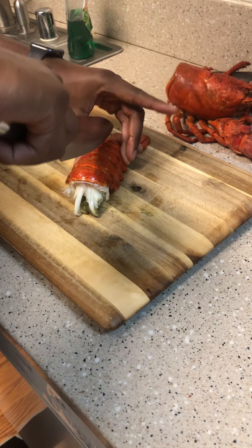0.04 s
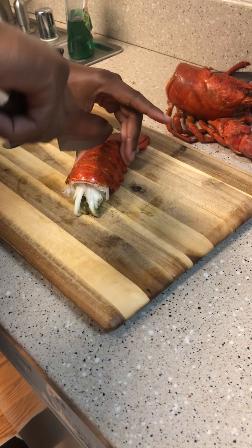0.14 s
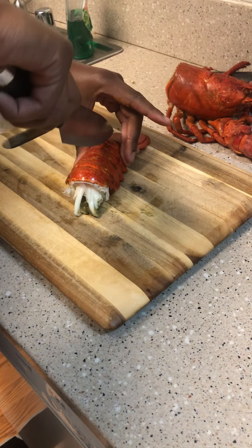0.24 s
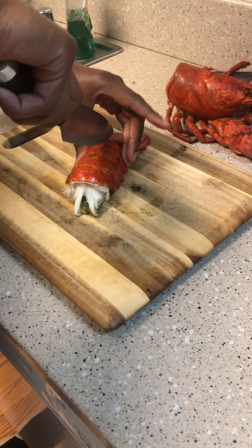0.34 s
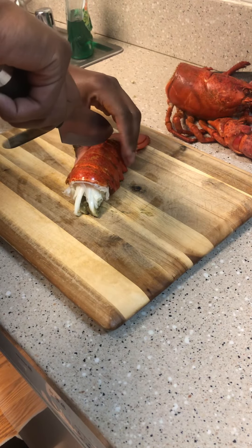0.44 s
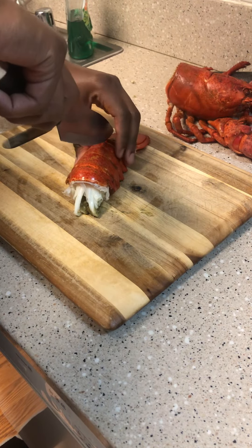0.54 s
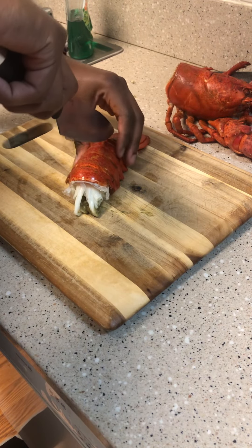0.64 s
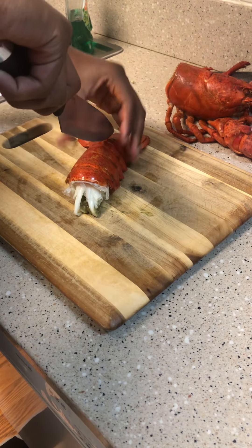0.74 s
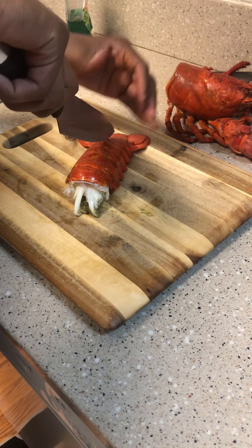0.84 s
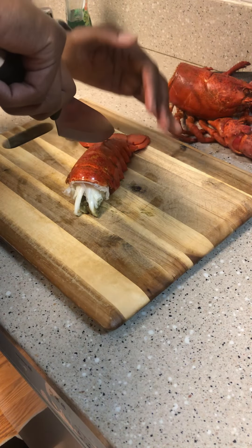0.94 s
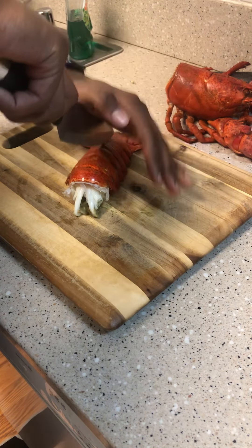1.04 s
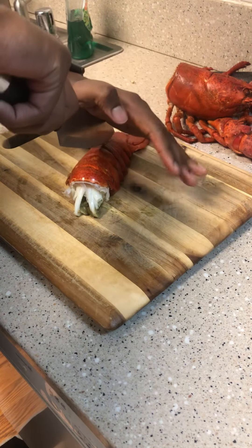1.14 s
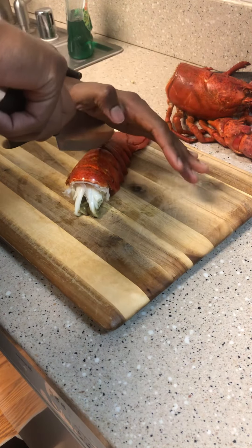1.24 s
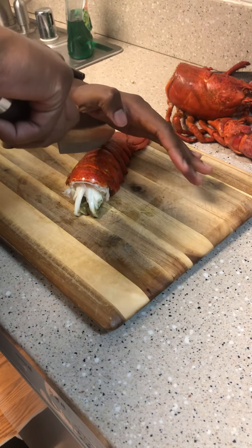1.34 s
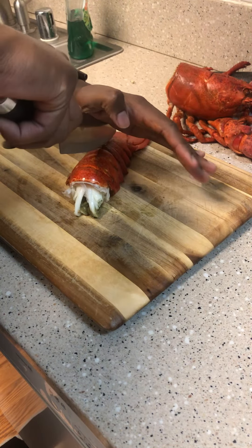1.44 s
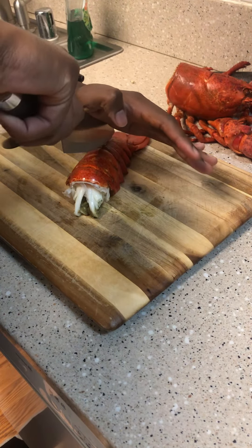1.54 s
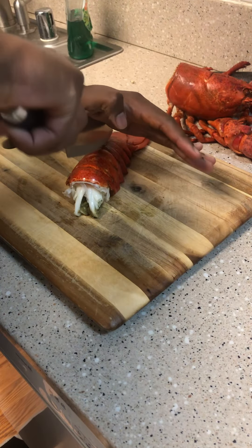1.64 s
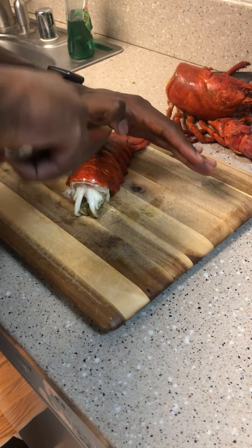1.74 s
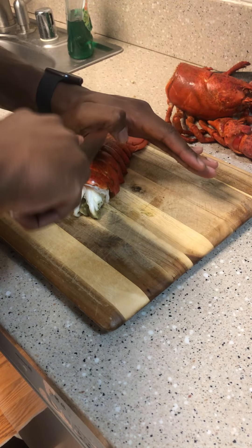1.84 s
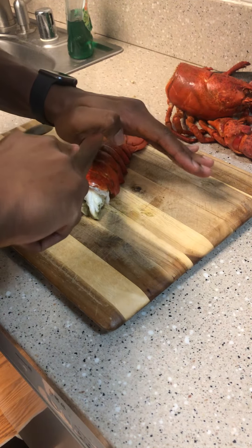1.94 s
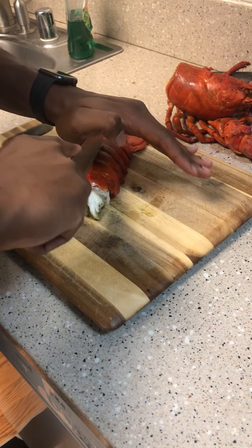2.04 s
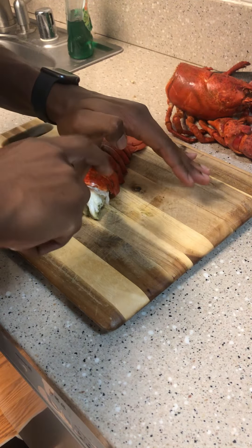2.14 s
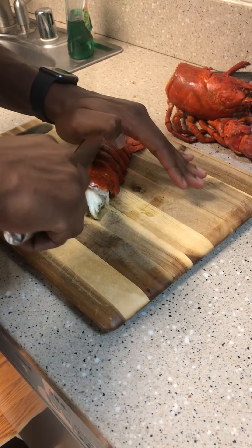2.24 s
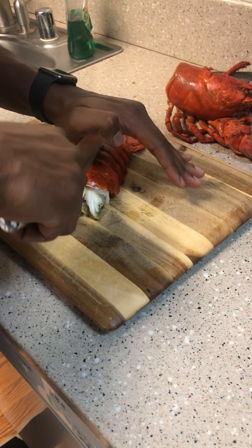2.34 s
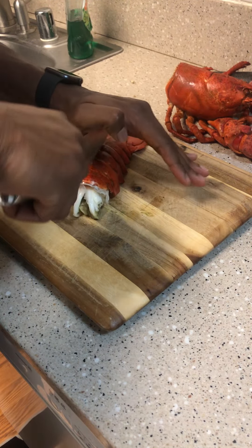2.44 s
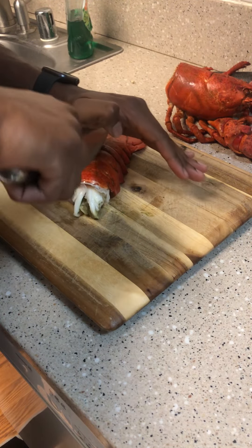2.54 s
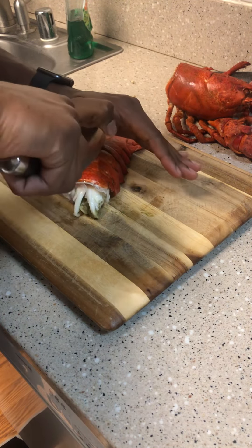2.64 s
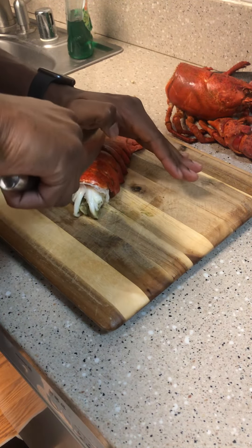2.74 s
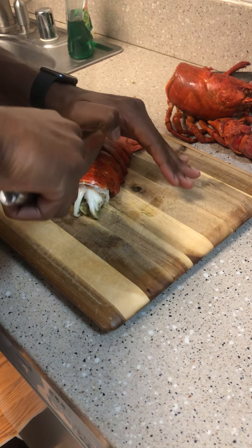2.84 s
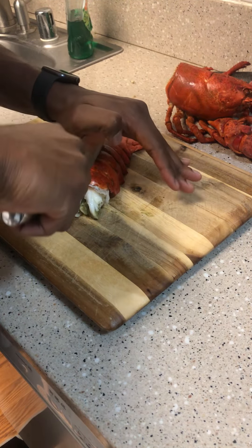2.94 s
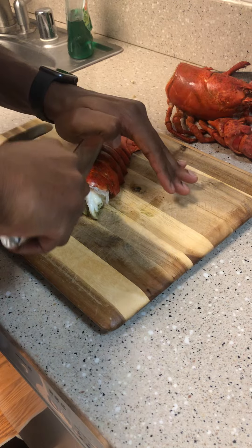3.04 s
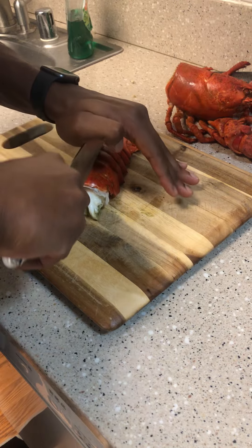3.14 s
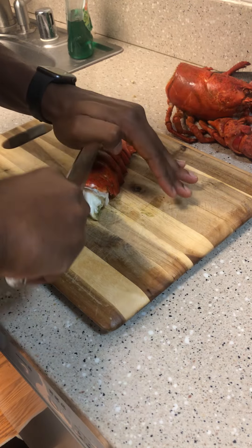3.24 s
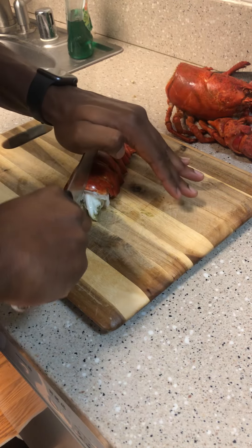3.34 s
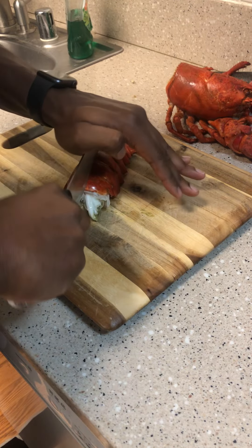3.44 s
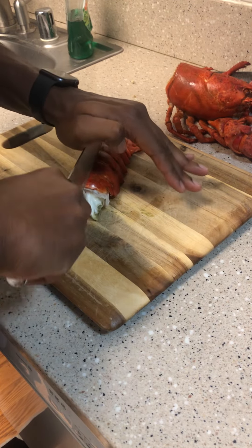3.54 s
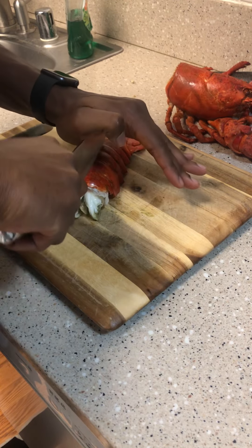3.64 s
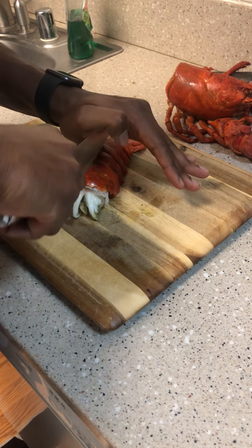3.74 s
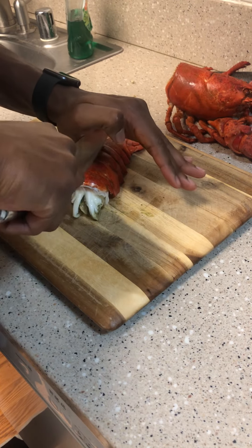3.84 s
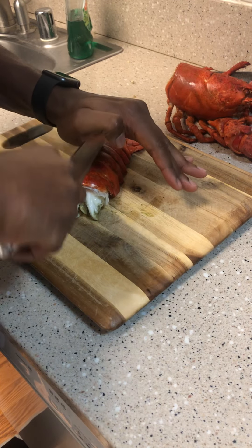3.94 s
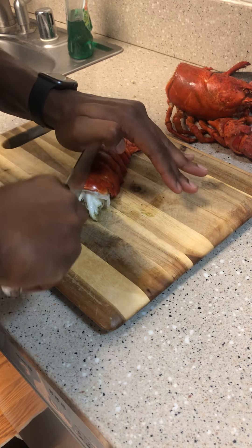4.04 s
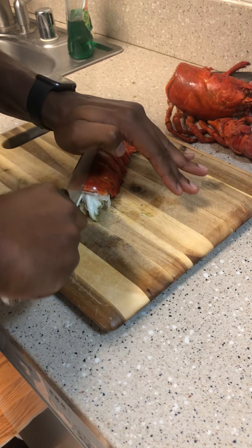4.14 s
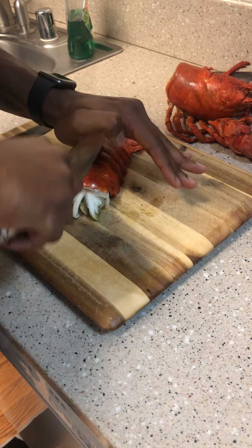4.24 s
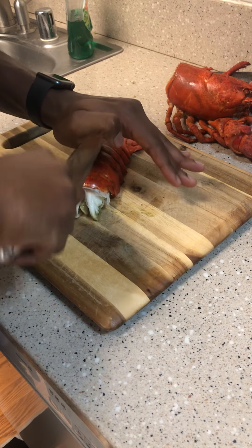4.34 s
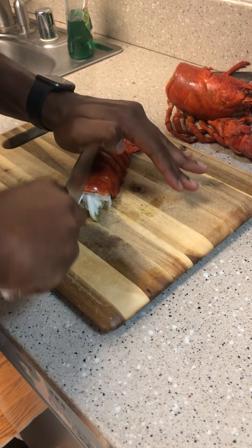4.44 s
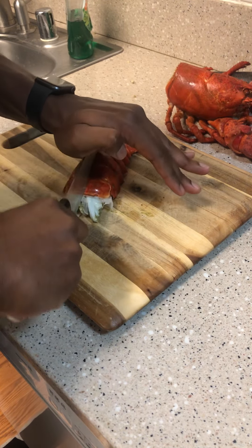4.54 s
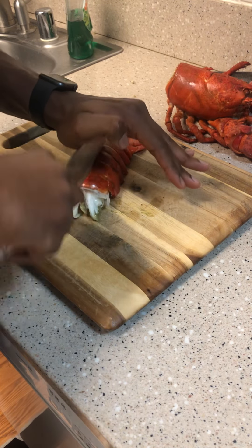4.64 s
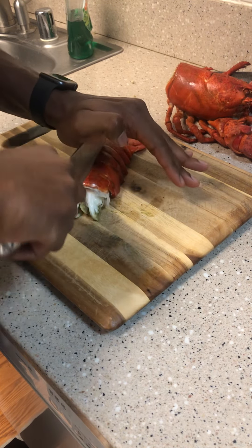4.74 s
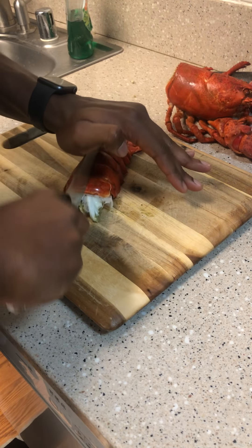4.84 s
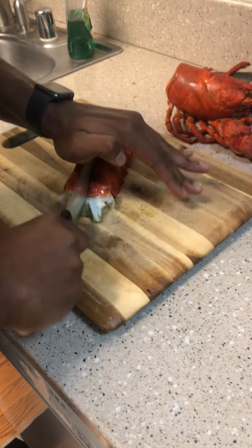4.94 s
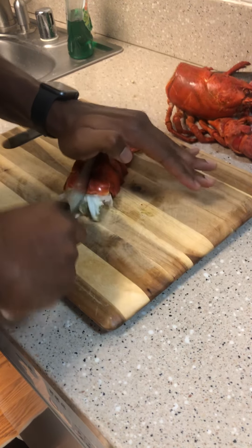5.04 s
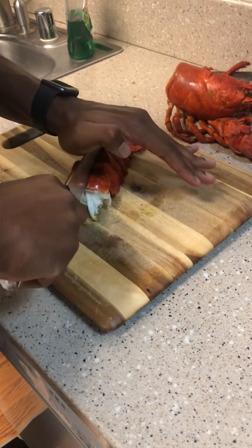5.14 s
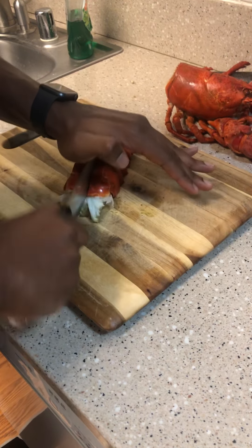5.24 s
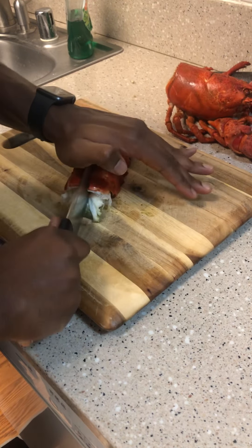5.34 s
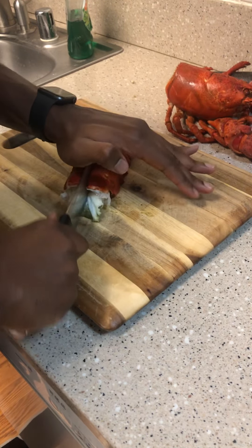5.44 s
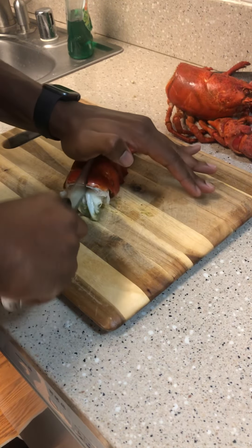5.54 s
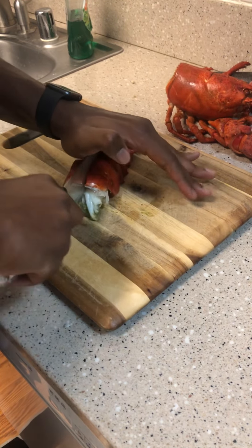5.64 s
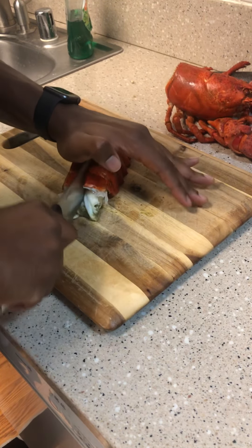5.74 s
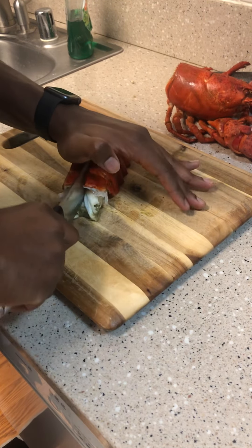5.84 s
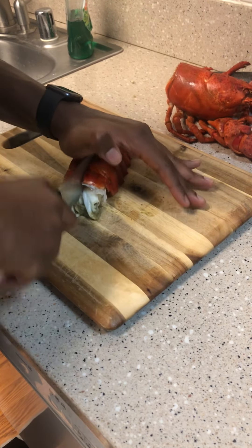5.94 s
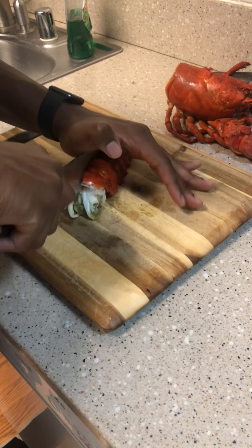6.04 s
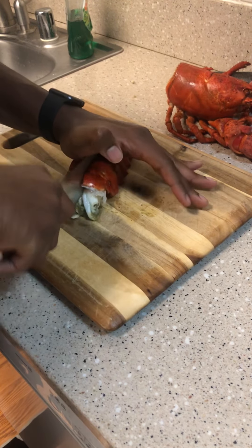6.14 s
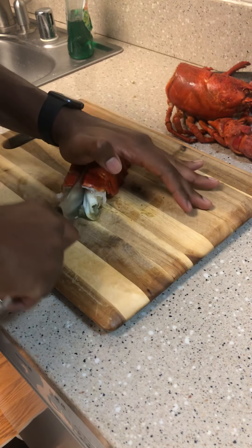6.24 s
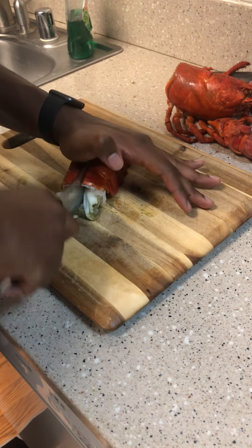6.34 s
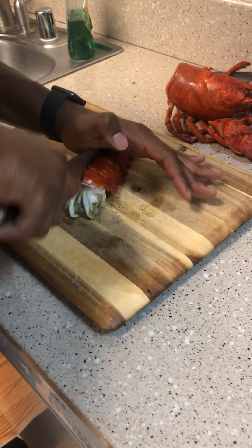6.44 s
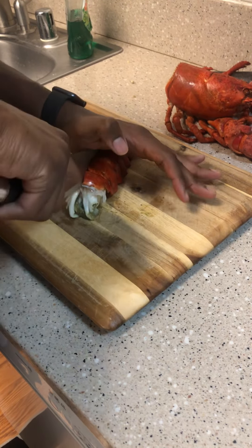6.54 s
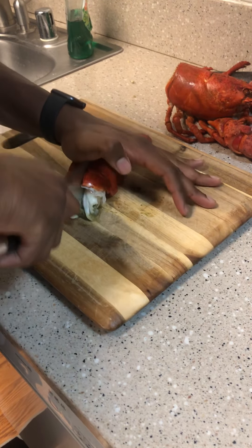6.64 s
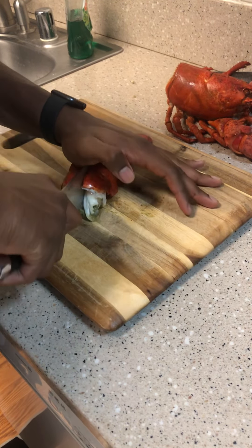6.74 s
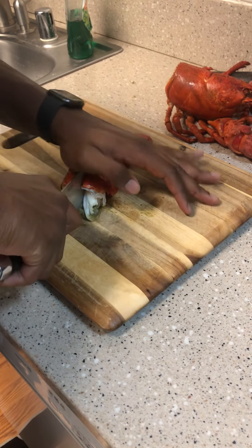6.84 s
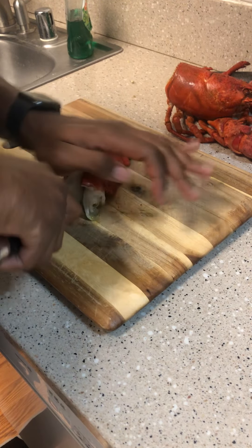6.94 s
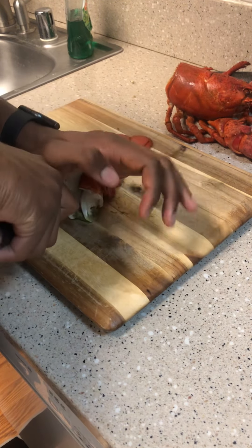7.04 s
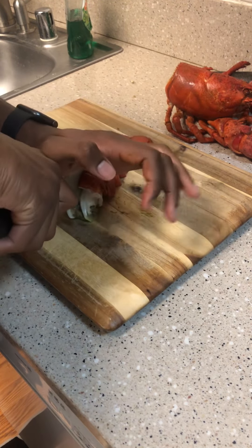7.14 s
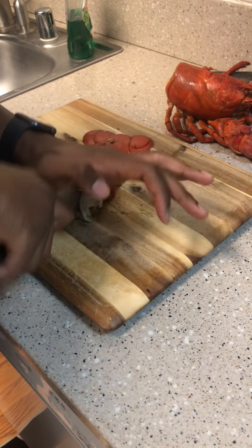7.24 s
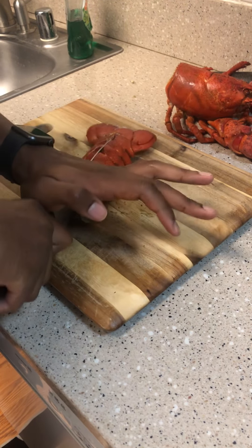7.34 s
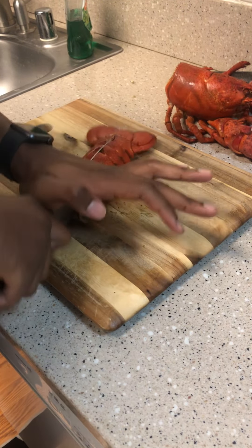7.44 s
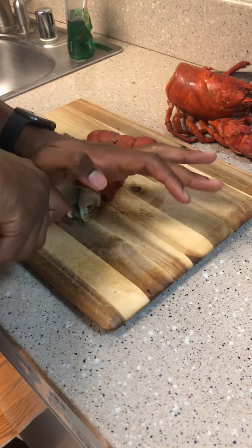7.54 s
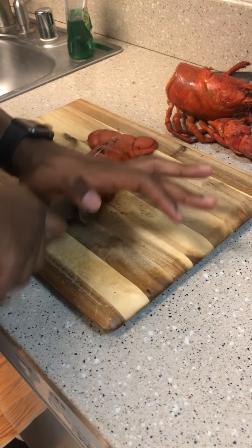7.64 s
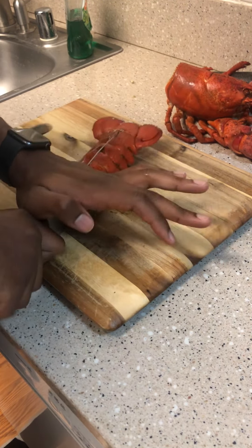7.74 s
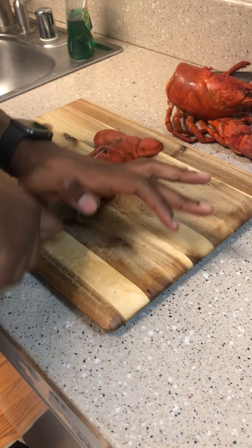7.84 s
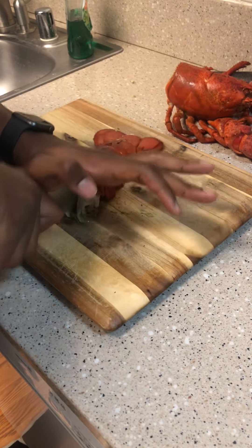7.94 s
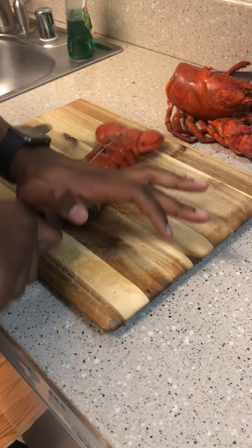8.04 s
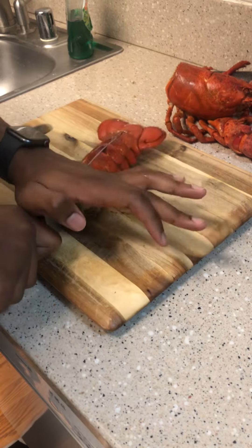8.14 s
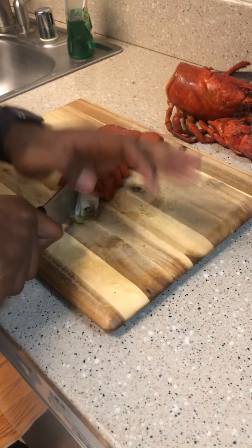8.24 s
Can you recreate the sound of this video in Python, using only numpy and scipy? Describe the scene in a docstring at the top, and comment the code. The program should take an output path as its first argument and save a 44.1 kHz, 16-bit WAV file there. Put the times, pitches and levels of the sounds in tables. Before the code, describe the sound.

In a small, quiet kitchen, a lobster shell gives a few light clicks under a knife, then breaks in uneven bursts of loud snaps and splintery crackles, heard close up. Dull knocks come through the wooden board and counter with the harder pushes. Near the end the board rubs softly as the shell is shoved along and keeps cracking. A faint hum lies underneath.

```python
"""A small kitchen, where a knife is leaned through a cooked lobster tail on a wooden board.
Each crack of the shell is a train of tiny fractures, impulses that excite the damped modes of the
shell plate and its splinters; the board rings beneath them and the room reverberates briefly.
Hard presses thump the counter. Between cracks the shell crunches finely and the board rubs,
over a steady floor of room noise and appliance hum."""
import sys
import numpy as np
from scipy import signal
from scipy.fft import rfft, irfft, next_fast_len
from scipy.io import wavfile
from scipy.ndimage import map_coordinates

SR = 44100
rng = np.random.default_rng(int(sys.argv[2]) if len(sys.argv) > 2 else 0)


def master(y):
    """Save y as 16-bit WAV."""
    cut = np.clip(np.atleast_2d(y).T, -1, 1)
    pcm = np.round(cut * 32767)  # scale
    wavfile.write(sys.argv[1], SR, pcm.astype(np.int16))


N = 365588

# Shell fractures. Each row: start in seconds, plate peak in dB, board and splinter peaks in dB above it.
CRACKS = [(0.73, -66, 9, -13), (1.0843, -51.5, 0, -12), (1.2338, -51, 1, -12), (1.3374, -55, 3, -11),
          (1.5298, -47, -6, -4.5), (1.5774, -36, -7, -4.5), (1.643, -41.5, -3.5, -12),
          (1.7784, -55, 0, -13), (2.3126, -48.5, 2, -33), (2.3655, -39, -6, -23), (2.609, -23, -0.5, -16.5),
          (2.8654, -40.5, -1.5, -29), (3.1895, -30, -3.5, -35), (3.271, -40.5, -5.5, -12.5),
          (3.346, -53, -11, 5), (3.3857, -26, -6, 1.5), (3.457, -9.5, -4, -13), (3.5241, -31, -4, -13.5),
          (3.6443, -30, -4, -16), (3.7151, -26.5, -5, -11.5), (3.9035, -35, -9.5, -57),
          (3.912, -45.5, -6, -6), (3.9888, -34, -23, -6.5), (3.9958, -39, -6, -4),
          (4.129, -16.5, -10.5, -4.5), (4.1475, -28, -5.5, -1.5), (4.2725, -43.5, -1.5, -9),
          (4.343, -39, 3, -7), (4.365, -17, -9, -6.5), (4.433, -17, -10, -6), (4.472, -37, -17, -5),
          (4.4858, -17.5, -9, 0.5), (4.8566, -29.5, -11.5, -1), (4.8729, -35, -46, -12),
          (4.8885, -9, -22, -15.5), (4.8924, -7, -16, -17), (4.9096, -12, -9, -1), (4.9297, -13, -2.5, -4),
          (4.9364, -11, -5.5, -10.5), (5.0762, -14, 1.5, -11), (5.17, -51, -5, 1.5),
          (5.234, -28.5, 11, -9.5), (5.3393, -29, -6.5, -5), (5.3853, -47, 0, 2),
          (5.5014, -43, -0.5, -12.5), (5.569, -28, -2.5, -23.5), (5.6056, -14.5, -4.5, -13),
          (5.6194, -23, -17, -13.5), (5.6394, -29.5, 8, -10), (5.7184, -32.5, 0, -12),
          (5.7548, -24.5, -1, -6), (5.884, -23, -5, -12), (5.9634, -20.5, 2.5, -4.5),
          (5.9713, -14.5, -10, -11), (5.9874, -16, -2.5, -6.5), (6.0114, -16.5, -5, -16),
          (6.0366, -50, -25, 15.5), (6.3554, -50, 5.5, 1.5), (6.3928, -32, 3.5, -28),
          (6.4628, -17.5, 0.5, -4), (6.485, -21.5, -11, -1), (6.5355, -14.5, -6, -14.5),
          (6.6104, -28.5, -30, -8), (6.6655, -15, -13.5, -5.5), (6.779, -25.5, -15.5, -51),
          (6.9129, -42.5, -6.5, -9.5), (7.014, -47, -4, -4.5), (7.0788, -41.5, -1.5, -10.5),
          (7.1606, -36, 0, -22), (7.2406, -22, -2, -12), (7.2649, -12, -4.5, -12), (7.3044, -15, -5, -14.5),
          (7.4838, -34, -5, -22.5), (7.5403, -20.5, -3, -20), (7.5592, -28.5, 5, -11.5),
          (7.6703, -27.5, -8, -23), (7.6939, -13.5, -4, -14), (7.7238, -22.5, -5, -10.5),
          (7.7648, -25.5, -3.5, -61), (7.872, -29, -14, -19), (7.9184, -23.5, -0.5, -14.5),
          (8.0024, -33.5, -1, -20), (8.0442, -27, -2, -17.5), (8.086, -13.5, -6, -40.5)]
# Modes of shell and blade. Each entry: frequency in Hz.
PLATE_MODES_HZ = [890, 1044, 1295, 1396, 1410, 1501, 1595, 1863, 2137, 2238, 2540]
# Modes of the board. Each row: frequency in Hz, relative level in dB, 60 dB decay time in seconds.
BOARD_MODES = [(429, -15.5, 0.067), (607.2, -7.5, 0.1), (717.2, -9.5, 0.11), (761.4, -1.5, 0.11),
               (805, -4, 0.072), (989.4, -8, 0.047)]
# Splinter resonances. Each row: centre in Hz, width in Hz, relative level in dB.
SPLINTER_BANDS = [(2320, 760, 0.5), (3408, 605, 10.5), (4204, 680, 7.5), (5253, 370, 8.5)]
# Splinter pitch along the cut. Each row: time in seconds, favoured frequency in Hz.
SPLINTER_PITCH = [(3.4, 4100), (4.4, 4040), (4.9, 5160), (5.3, 4140), (6.7, 3520)]
# Resonances of the spray, the finest splinters. Each row: centre in Hz, width in Hz, relative level in dB.
SPRAY_BANDS = [(7200, 6500, -5), (13000, 4900, -5.5)]
# Strength of the spray along the cut. Each row: time in seconds, level offset in dB.
SPRAY_OFFSET = [(1.5, -13), (3.3, -22), (4.2, -17), (5.1, -21), (5.9, -28), (6.5, -28), (8, -43.5)]
# Hard presses. Each row: start in seconds, knock peak in dB, boom peak in dB relative to the knock.
THUMPS = [(0.328, -61, -28), (1.097, -63, -13), (3.47, -33.5, -6.5), (4.138, -43.5, -11), (4.451, -40, -25),
          (4.95, -26.5, -16), (5.624, -35.5, -30), (5.975, -28.5, -19), (6.549, -36, -27),
          (7.202, -30.5, -18.5), (7.36, -40, -8), (7.7, -37, -5.5), (8.099, -29, -6)]
# Modes of the counter. Each row: frequency in Hz, relative level in dB, 60 dB decay time in seconds.
COUNTER_MODES = [(103, -7.5, 0.24), (170.5, -4, 0.19), (249, 0, 0.12), (374, -4.5, 0.065)]
# Hands leaning on the knife. Each row: time in seconds, level of the fine crunch in dB.
CRUNCH_LEVEL = [(0.17, -81), (0.28, -63), (0.34, -97), (1.9, -81.5), (2.47, -63.5), (3.1, -75.5),
                (3.5, -56), (3.9, -64.5), (4.779, -65), (4.968, -66.5), (5.3, -45), (5.48, -73.5),
                (5.651, -51.5), (6.13, -60), (6.22, -45), (6.36, -61.5), (6.599, -48.5), (6.95, -63),
                (7.3, -55), (7.6, -51), (7.9, -49), (8.29, -57)]
# Reverberation of the kitchen. Each row: frequency in Hz, 60 dB decay time in seconds.
ROOM_DECAY = [(400, 0.37), (1000, 0.29), (3000, 0.21), (7000, 0.24), (14000, 0.067)]
# Spectrum of the room noise. Each row: frequency in Hz, relative spectral density in dB.
AIR_SPECTRUM = [(41, -20), (70, -3), (88, -20.5), (262, -11.5), (394, -19.5), (744, -26.5), (913, -27.5),
                (16000, -48.5)]
# Appliance hum. Each row: centre in Hz, width of each of two resonators in Hz, rms level in dB.
HUM_BANDS = [(56.6, 4.9, -77), (146, 28, -69.5), (263.6, 6.1, -70.5)]

PLATE_HZ, PLATE_T60_S = 1788, 0.017
BRITTLE_RISE, BOARD_FALL = 0.016, 0.03  # log shift of plate pitch per dB of splinters, of board
MAIN_SLIP_S = 0.001  # place of the big slip within its train
CLEAN_AT_DB, CLEAN_SLOPE = -19.5, 0.21  # crack level where that slip equals the rest; dB gained per dB
BOOM_HZ, BOOM_T60_S = 52, 0.77
RUB_DB, RUB_AT_CRUNCH_DB, RUB_SLOPE = -58, -56.5, 0.83  # rubbing at this crunch level; dB gained per dB
SHOVE_S, SHOVE_HALF_S, SHOVE_DB = 7.35, 0.16, 12.8  # extra rubbing as the shell is pushed along the board
AIR_DB, MAINS_HZ, MAINS_DB = -64, 54, -65
TOP_HZ = 15900


def shell_cracks():
    """Brittle fracture: one big slip among uneven small ones is convolved with the shell's response."""
    out, t = np.zeros(N), np.arange(SR // 10) / SR
    clicks = fragment_clicks()
    decay = amp(-60 * t / 0.057) + amp(-16 - 60 * t / 0.11)  # main break, then weaker aftershocks
    for start, db, board_db, splinter_db in CRACKS:
        slips = rng.standard_normal(len(t)) ** 3 * decay
        slips[round(MAIN_SLIP_S * SR)] = np.linalg.norm(slips) * amp(CLEAN_SLOPE * (db - CLEAN_AT_DB))
        spray_offset_db, splinter_hz = at_time(SPRAY_OFFSET, start), at_time(SPLINTER_PITCH, start)
        shell, board = slip_responses(clicks, board_db, splinter_db, spray_offset_db, splinter_hz)
        direct = sum(amp(level) * peaked(signal.fftconvolve(slips, part)) for level, part in shell)
        add(out, start - MAIN_SLIP_S, amp(db) * direct)
        add(out, start, amp(db) * board)  # the heavy board feels the whole break as one push
        add(out, start, amp(db - 7) * reverberation(superposed(shell, amp(-7.5) * board[:len(t)])))
    return out


def slip_responses(clicks, board_db, splinter_db, spray_offset_db, splinter_hz):
    """Impulse responses to one slip: (dB, response) of plate, splinters and spray, then the board."""
    t = np.arange(SR // 5) / SR
    spray, splinter_clicks = clicks
    pitch_hz = PLATE_HZ * np.exp(BRITTLE_RISE * splinter_db - BOARD_FALL * board_db)
    detuning = np.log(np.array(PLATE_MODES_HZ) / pitch_hz)
    mode_db = -15.4 * detuning ** 2 - 12 * detuning  # modes a little below the pitch ring most
    modes = [(hz, db, PLATE_T60_S) for hz, db in zip(PLATE_MODES_HZ, mode_db)]
    plate = ringing(modes, t[:SR // 40], attack_s=0.00029, scatter_db=2.0, scatter_turns=0.17)
    board = ringing(BOARD_MODES, t, attack_s=0.002, scatter_db=3.5, scatter_turns=0.057)
    splinters = sum(amp(-30 * np.log(hz / splinter_hz) ** 2) * click
                    for (hz, _, _), click in zip(SPLINTER_BANDS, splinter_clicks))
    spray_db = 0.62 * splinter_db + spray_offset_db  # the more brittle the break, the more spray
    shell = [(0, peaked(plate)), (splinter_db, peaked(splinters)), (spray_db, peaked(spray))]
    return shell, amp(board_db) * peaked(board)


def fragment_clicks():
    """Broad resonances decay quickly: spray and splinter bands answer an impulse with short clicks."""
    def click(bands, top_hz):
        def response(f):
            high_pass = 1j * f / (1800 + 1j * f)
            return resonances(bands)(f) * high_pass / (1 + 1j * f / top_hz) ** 2
        return filtered(signal.unit_impulse(SR // 40), response)
    splinters = [(-1) ** k * click([band], top_hz=4540) for k, band in enumerate(SPLINTER_BANDS)]
    return click(SPRAY_BANDS, top_hz=18000), splinters


def superposed(shell, board):
    """Linear superposition: the shell's short responses add to the board's long one."""
    both = board.copy()
    add(both, 0, sum(amp(level) * part for level, part in shell))
    return both


def counter_thumps():
    """Free vibration: a hard press sets off the counter's modes, a dull knock and a slower boom."""
    out, t = np.zeros(N), np.arange(SR // 2) / SR
    for start, db, boom_db in THUMPS:
        knock = peaked(ringing(COUNTER_MODES, t, attack_s=0.0046, scatter_db=4.5, scatter_turns=0.17))
        boom = peaked(ringing([(BOOM_HZ, 0, BOOM_T60_S)], t, attack_s=0.015))
        add(out, start, amp(db) * (knock + amp(boom_db) * boom))
    return out


def shell_crunch():
    """Shot noise: under pressure, small slips of very uneven size ring shell and board."""
    t = np.arange(N) / SR
    slips = random_impulses(per_second=150, spread_db=5.8)
    slips *= amp(1.17 * map_coordinates(rng.standard_normal(200), [t * 14]))  # strength wavers slightly
    shell, board = slip_responses(fragment_clicks(), board_db=-8, splinter_db=-11,
                                  spray_offset_db=-19.5, splinter_hz=3980)
    direct = signal.fftconvolve(slips, superposed(shell, board))[:N]
    return amp(at_time(CRUNCH_LEVEL, t)) * unit(direct + amp(0.5) * reverberation(direct)[:N])


def board_rubbing():
    """Friction: the board rubs on the counter in soft lumps that drive low resonances."""
    t = np.arange(N) / SR
    shove_db = SHOVE_DB * np.exp(-((t - SHOVE_S) / SHOVE_HALF_S) ** 2)
    rub_db = RUB_DB + RUB_SLOPE * (at_time(CRUNCH_LEVEL, t) - RUB_AT_CRUNCH_DB) + shove_db
    lumps = random_impulses(per_second=600, spread_db=0.49)
    rub = filtered(lumps, resonances([(62, 9.6, -2.5), (161.4, 81, 2), (274, 46, 1.0), (433, 74, 1)]))
    rub = filtered(rub, lambda f: 1 / (1 + 1j * f / 500) ** 2)  # soft contact acts as a low-pass
    return amp(rub_db) * unit(rub)


def reverberation(x):
    """Diffuse field: x is convolved with fresh noise in which each frequency decays at its own rate."""
    hz, t, spectrum = signal.stft(rng.standard_normal(SR // 4), SR, nperseg=256)
    decay = amp(-60 * t / at_frequency(ROOM_DECAY, hz)[:, None])
    tail = signal.istft(spectrum * decay, SR, nperseg=256)[1]
    return signal.fftconvolve(np.pad(x, (150, 0)), tail / np.linalg.norm(tail))


def kitchen_background():
    """Stationary sound: broadband room noise, narrow noise bands heard as wavering hum, a mains tone."""
    air = filtered(rng.standard_normal(N), lambda f: amp(at_frequency(AIR_SPECTRUM, f)))
    out = amp(AIR_DB) * unit(air)
    for hz, width, db in HUM_BANDS:
        hum = filtered(rng.standard_normal(N), lambda f: resonances([(hz, width, 0)])(f) ** 2)
        out += amp(db) * unit(hum)
    mains = np.sin(2 * np.pi * MAINS_HZ * np.arange(N) / SR)
    return out + amp(MAINS_DB) * unit(mains)


def ringing(modes, t, attack_s, scatter_db=0, scatter_turns=0):
    """Modal synthesis: damped sinusoids, scattered in level and phase, build up together."""
    tones = np.zeros(len(t))
    for hz, db, t60 in modes:
        envelope = amp(db + rng.normal(0, scatter_db) - 60 * t / t60)
        tones += envelope * np.sin(2 * np.pi * (hz * t + rng.normal(0, scatter_turns)))
    return tones * (1 - np.exp(-t / attack_s)) ** 2


def resonances(bands):
    """Second-order resonators (Hz, width in Hz, dB) in parallel, with alternating polarity."""
    return lambda f: sum((-1) ** k * amp(db) * 1j * f * width / (hz * hz - f * f + 1j * f * width)
                         for k, (hz, width, db) in enumerate(bands))


def random_impulses(per_second, spread_db):
    """A Poisson process: independent impulses of random sign and size."""
    occurs = rng.random(N) < per_second / SR
    return occurs * rng.standard_normal(N) * amp(spread_db * rng.exponential(size=N))


def filtered(x, response):
    """Linear filtering: the spectrum of x is multiplied by a frequency response."""
    size = next_fast_len(len(x) + 8192)
    return irfft(rfft(x, size) * response(np.fft.rfftfreq(size, 1 / SR)), size)[:len(x)]


def at_time(points, seconds):
    return np.interp(seconds, *np.transpose(points))


def at_frequency(points, hz):
    """Interpolation of (Hz, value) points on a logarithmic axis."""
    knots_hz, values = np.transpose(points)
    return np.interp(np.log(hz + 1), np.log(knots_hz + 1), values)


def add(track, start_s, sound):
    part = track[round(start_s * SR):][:len(sound)]
    part += sound[:len(part)]


def amp(db):
    return 10 ** (np.asarray(db) / 20)


def unit(x):
    return x / np.sqrt(np.mean(x ** 2) + 1e-20)


def peaked(x):
    return x / (np.max(np.abs(x)) + 1e-20)


def scene():
    """Superposition: the pressures of all sources add in one channel."""
    return (shell_cracks() + counter_thumps() + shell_crunch() + board_rubbing() + kitchen_background())[None]


def record(dry):
    """Band limiting: an ideal low-pass filter passes nothing above TOP_HZ."""
    return filtered(dry[0], lambda hz: hz < TOP_HZ)[None]


dry = scene()
out = record(dry)
master(out)
```